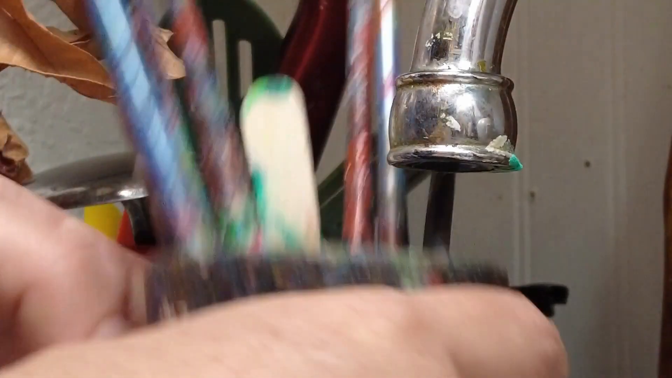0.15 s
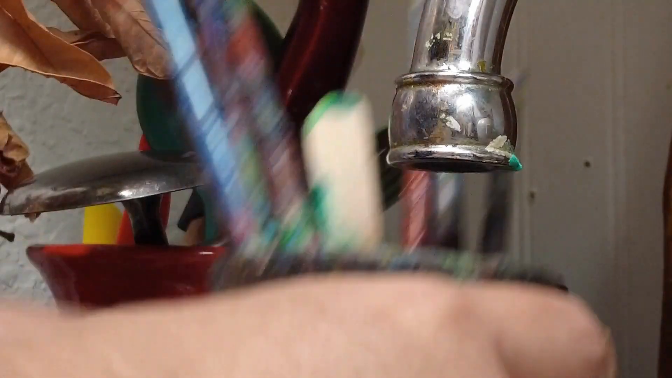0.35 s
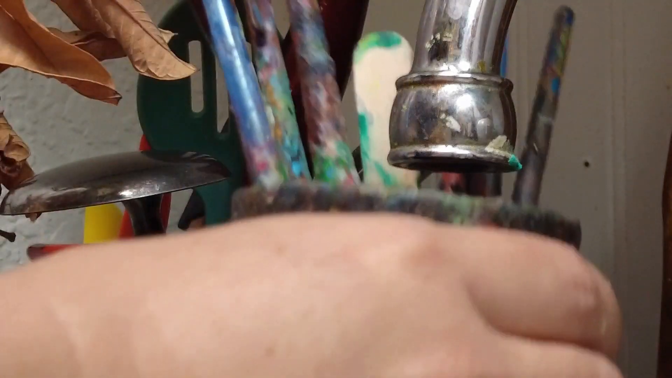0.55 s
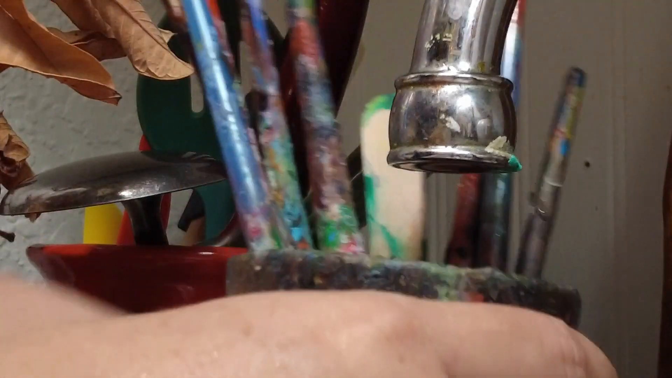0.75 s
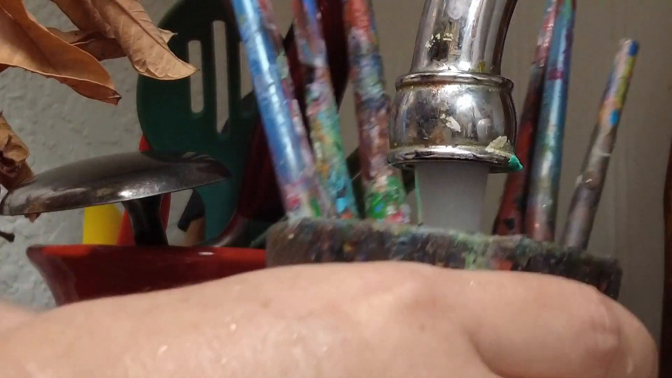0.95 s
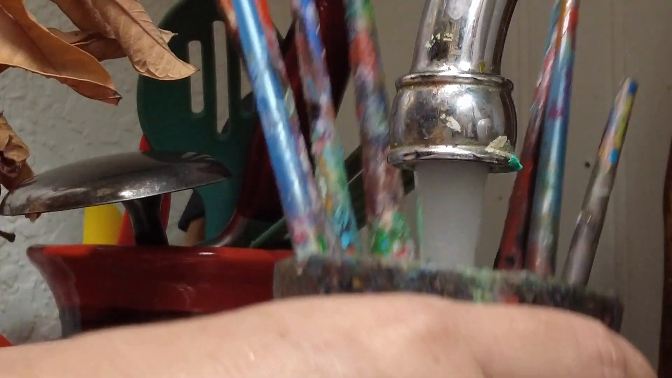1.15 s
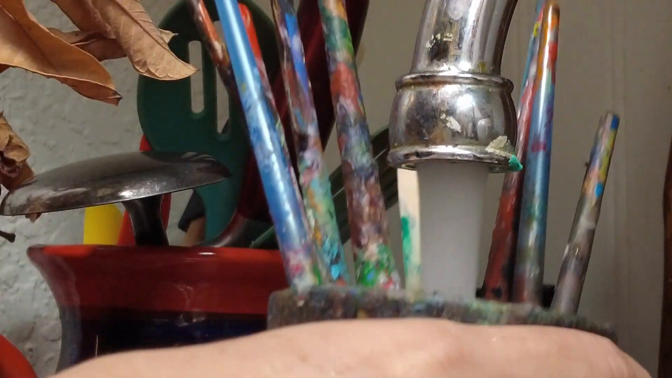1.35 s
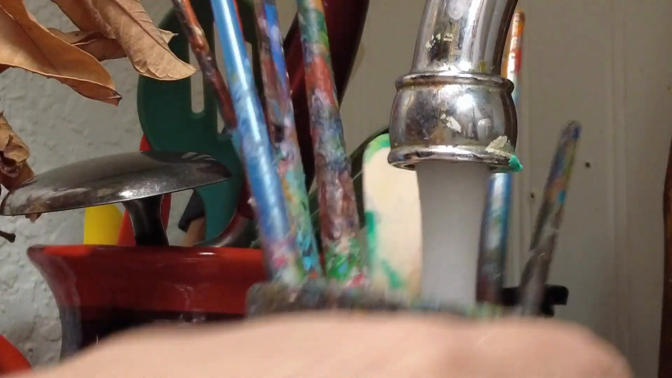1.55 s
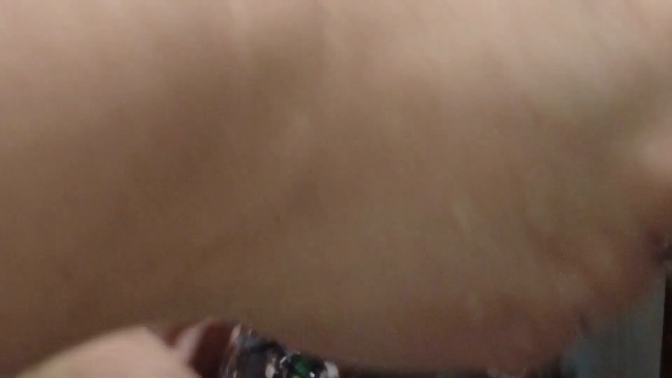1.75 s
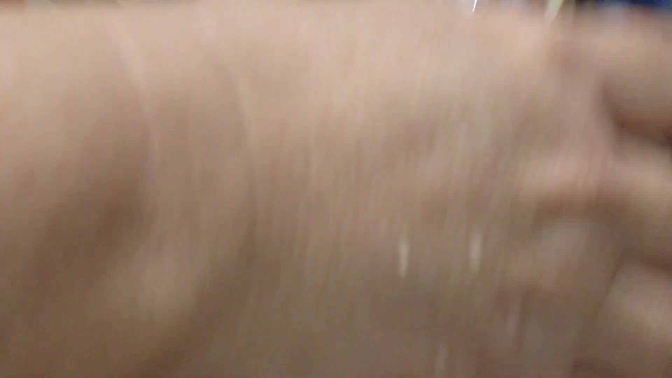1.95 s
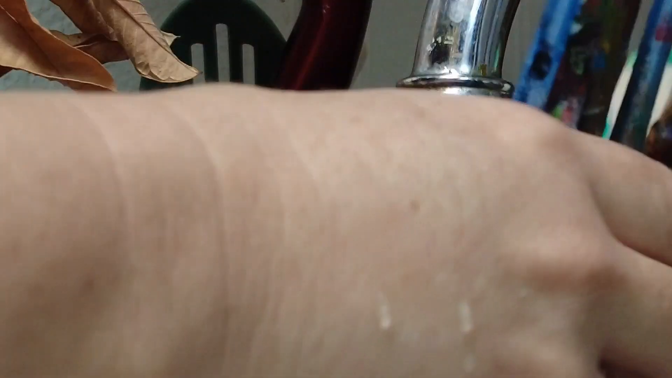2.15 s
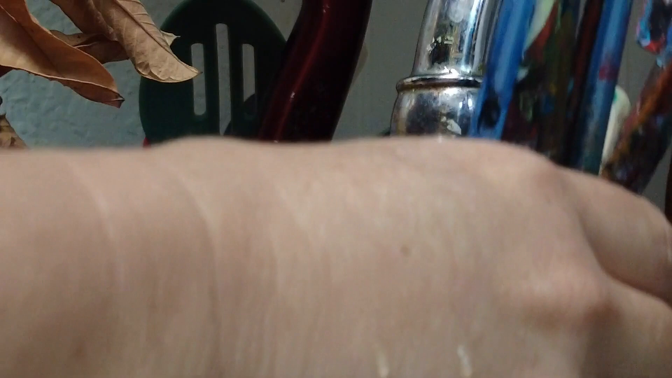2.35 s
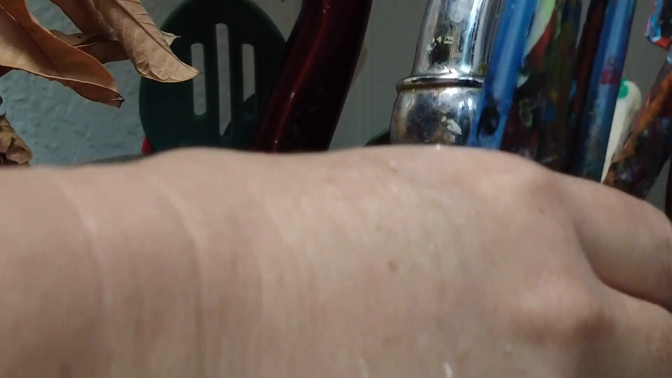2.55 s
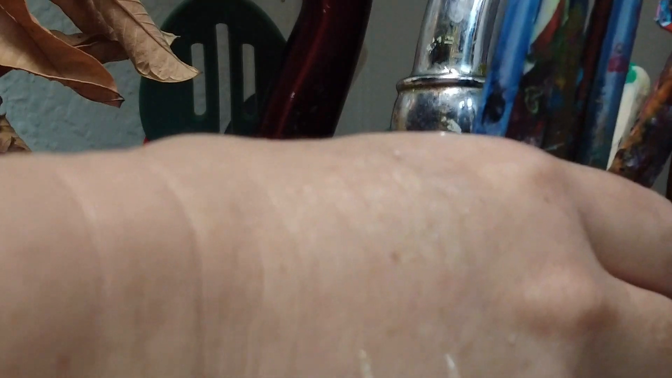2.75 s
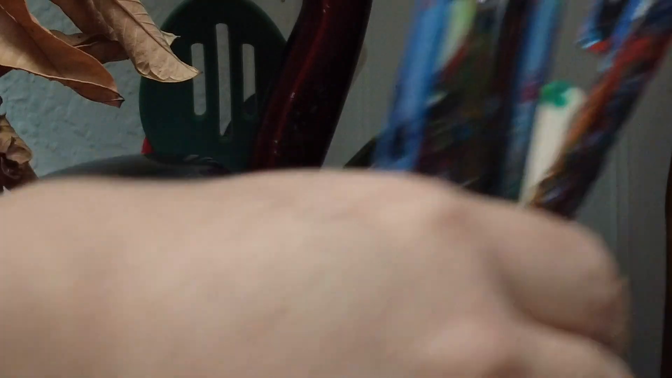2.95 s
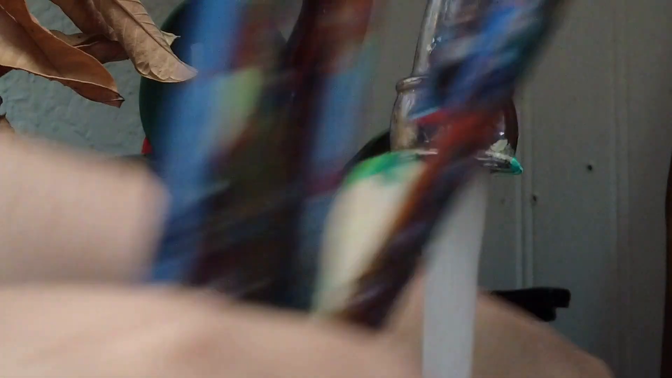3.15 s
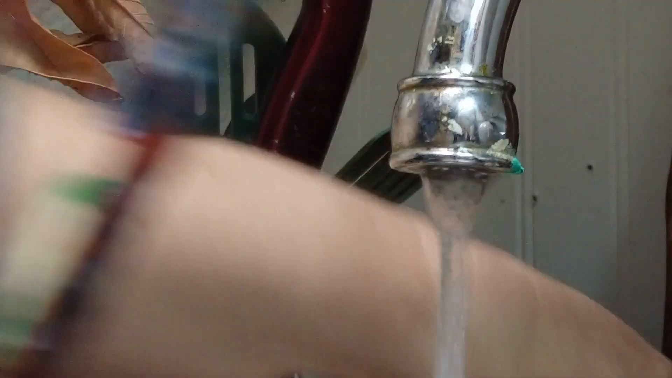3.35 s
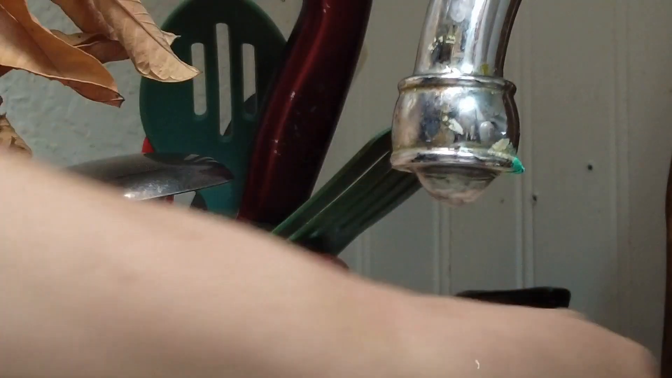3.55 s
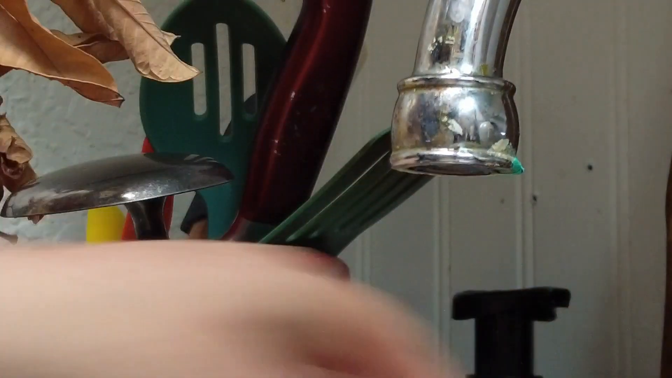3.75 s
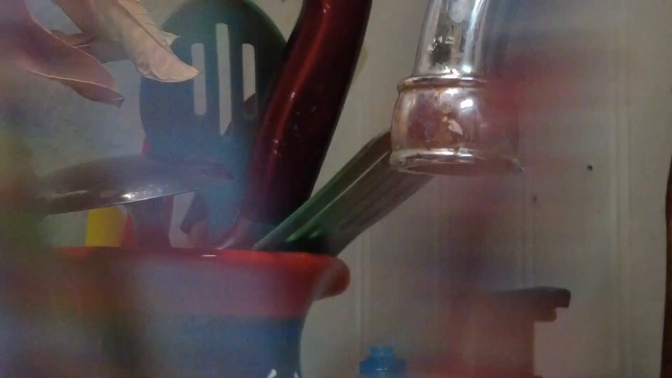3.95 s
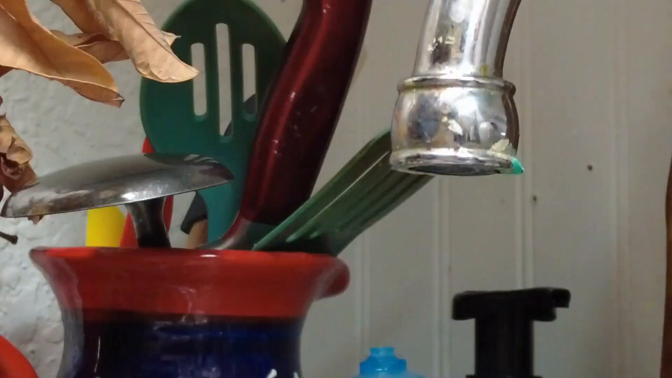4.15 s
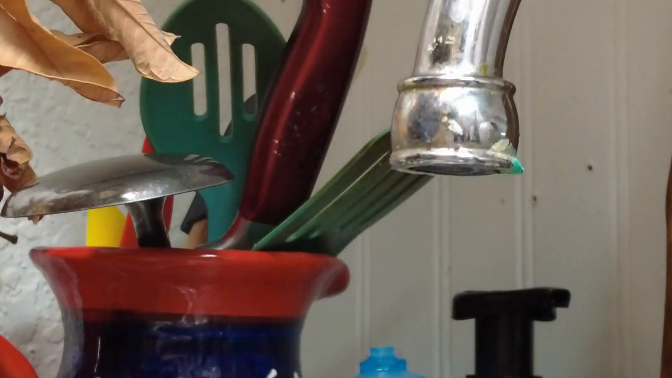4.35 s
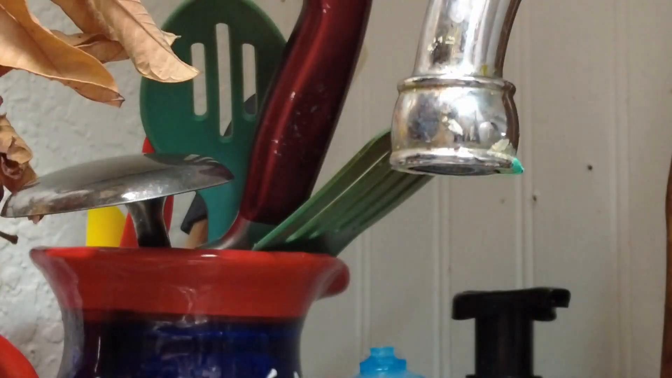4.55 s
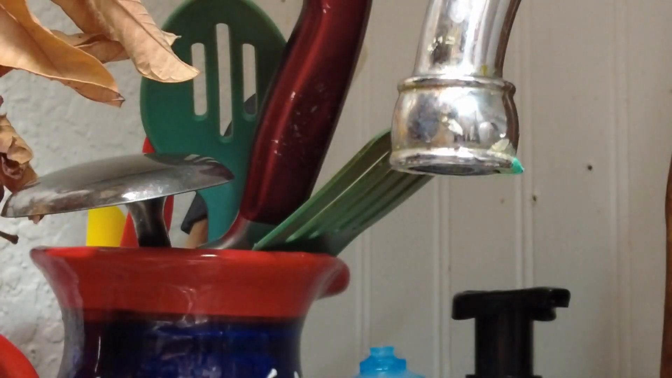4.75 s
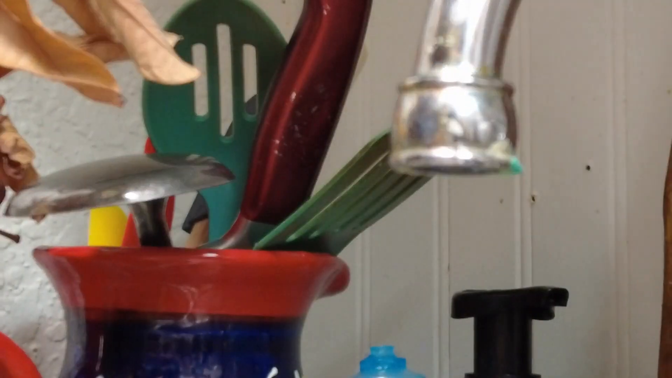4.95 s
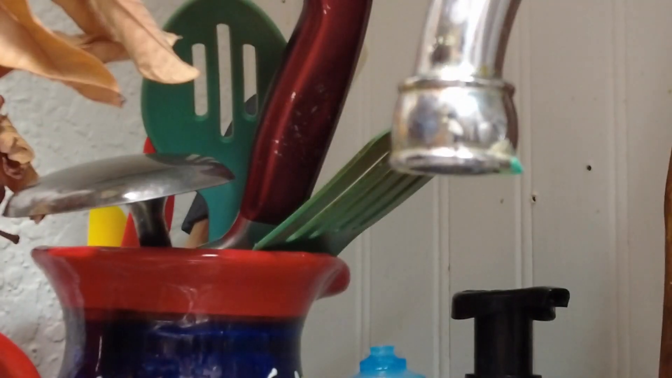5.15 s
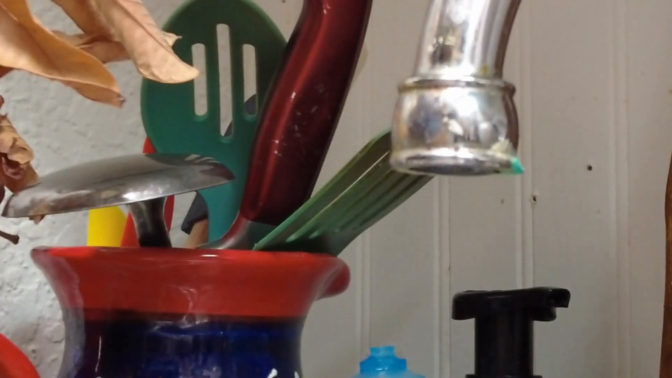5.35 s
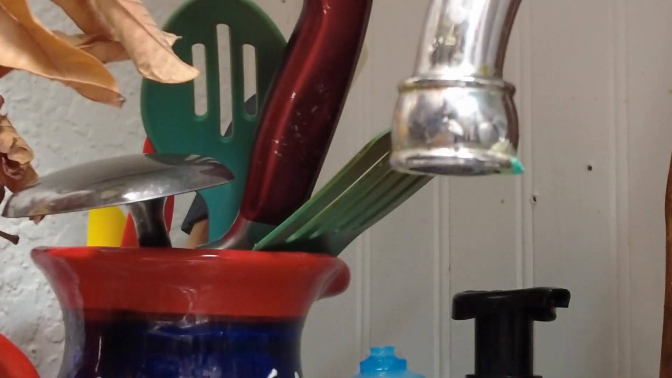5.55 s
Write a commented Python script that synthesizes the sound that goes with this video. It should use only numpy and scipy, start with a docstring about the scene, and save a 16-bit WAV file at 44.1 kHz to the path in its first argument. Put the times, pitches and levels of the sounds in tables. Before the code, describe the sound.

Close up, water drums and fizzes over a rattling cup of brushes, stops with a thump, and a cup lands before a raspy squeal.

```python
"""A quiet kitchen: a tap runs into a steel sink while a cup of paintbrushes is rinsed under it, heard close up.
Water is made of random drop impacts and noise, coloured by the basin and cup; bubbles are short rising tones.
Brush handles clack and scrape, the basin thumps and the tap is shut: blows are fading tones with a noise crack.
A thin squeal, built from unsteady tones, swells and fades off to one side; the cup is set down with a knock."""
import sys
import numpy as np
from scipy import signal
from scipy.fft import rfft, irfft, next_fast_len
from scipy.io import wavfile
from scipy.ndimage import uniform_filter1d, map_coordinates

SR = 44100
rng = np.random.default_rng(int(sys.argv[2]) if len(sys.argv) > 2 else 0)


def pcm_store(signal):
    """Save signal as 16-bit PCM."""
    levels = np.round(np.clip(np.atleast_2d(signal), -1, 1) * 32767)
    wavfile.write(sys.argv[1], SR, levels.astype(np.int16).T)


N = 251349  # length [samples]

# brush handles clacking in the cup: (time [s], peak level [dB], main ring [Hz])
HANDLE_CLACKS = [(.139, -26.5, 2700), (.216, -16.5, 2758), (.233, -23.5, 2740), (.987, -20.5, 3470),
                 (1.781, -13, 2935), (1.813, -11.5, 3170), (1.8395, -4.5, 3050), (1.933, -13, 2620),
                 (2.004, -12.5, 3530), (2.038, -14.5, 2600), (2.0524, -1.5, 2627), (2.1032, -3.5, 2630),
                 (2.12, -12.5, 2707), (2.187, -15, 2090), (3.178, -12, 2724), (3.362, -17.5, 3070),
                 (3.393, -11.5, 3100), (3.464, -17, 3220), (3.558, -13, 3083), (3.593, -13, 3070),
                 (3.885, -31.5, 2970)]
# ringing tones of the cup: (frequency [Hz], level [dB], time to fade by 60 dB [s])
CUP_MODES = [(1009.4, -14, 0.15), (1463, 4, 0.064), (1872, -2.5, 0.048), (2430, -5.5, 0.033),
             (2725, -6.5, 0.063), (3560, -22, 0.068), (4200, -15.5, 0.057), (6600, -42, 0.025)]
# colour of the fizzing jet and of the last drops: (frequency [Hz], level [dB per Hz])
FIZZ_COLOUR = [(300, -37), (1000, -8.5), (2300, 7), (3000, 8.5), (3650, 4), (4300, 6.5), (5600, 3.5),
               (7000, -1.5), (7900, 2.5), (10000, 0.5), (13000, -2.5), (15800, -3.5)]

OPEN_S, SHUT_S = 0.805, 3.465  # the water starts; the tap is shut
CUP_OUT_S, GURGLE_RELEASE_S = 2.95, 0.85  # the cup leaves the stream; its gurgle then dies away
TIP_S, TIP_LENGTH_S = 1.89, 1.5  # the cup is tipped: middle and length


def amp(db):
    """Turn decibels into a gain."""
    return 10 ** (np.asarray(db) / 20)


def unit(x):
    """Scale a sound to an average (rms) level of 1."""
    return x / np.sqrt(np.mean(x ** 2) + 1e-20)


def along(points, hz):
    """Read a curve of (frequency [Hz], value) points on a log frequency axis."""
    f, v = np.transpose(points)
    return np.interp(np.log(hz + 1), np.log(f + 1), v)


def colour(points):
    """A filter that follows (frequency [Hz], level [dB]) points."""
    return lambda hz: amp(along(points, hz))


def resonator(modes):
    """A filter with (frequency [Hz], width [Hz], level [dB]) resonances."""
    def response(f):
        total = 0
        for k, (centre, width, db) in enumerate(modes):
            peak = 1j * f * width / (centre * centre - f * f + 1j * f * width)
            total = total + (-1) ** k * amp(db) * peak  # alternate signs
        return total
    return response


def wobble(rate):
    """A smooth random curve with rate knots a second."""
    knots = rng.standard_normal(int(N * rate / SR) + 4)
    return map_coordinates(knots, [np.arange(N) * rate / SR])


def filtered(x, response):
    """Multiply the spectrum of x by a complex response of frequency."""
    m = next_fast_len(N + SR // 2)
    return irfft(rfft(x, m) * response(np.fft.rfftfreq(m, 1 / SR)), m)[..., :N]


def noise():
    """Two unrelated channels of white noise."""
    return rng.standard_normal((2, N))


def stereo(pair, response):
    """Colour two unrelated signals and blend them into left and right at rms 1."""
    # likeness of left and right: (frequency [Hz], likeness [0 to 1])
    likeness = [(100, 0.97), (330, 0.91), (600, 0.2), (1500, 0.78), (3000, 0.59), (5000, 0.11),
                (8000, 0.99), (15000, 0.98)]

    def blend(hz):
        turn = np.arccos(np.clip(along(likeness, hz), -1, 1)) / 2
        return response(hz) * np.array([np.cos(turn), np.sin(turn)])
    mid, side = filtered(pair, blend)
    return unit(np.array([mid + side, mid - side]))


def patter(rate, spread_db):
    """Two trains of impacts, rate a second, with shared times and scattered sizes."""
    hit = rng.random(N) < rate / SR
    scatter = np.clip(rng.standard_normal(N), -2, 2)
    size = hit * amp(np.clip(spread_db, 0, 10) * scatter)
    return unit(size * noise())


def patchy(pair, depth_db):
    """Make random patches of time and pitch louder or softer, so the sound keeps changing."""
    z = signal.stft(pair, nperseg=512)[2]
    field = uniform_filter1d(rng.standard_normal(z.shape[1:]), size=7, axis=0)
    field = uniform_filter1d(field, size=7, axis=1)
    return signal.istft(z * amp(depth_db * unit(field)), nperseg=512)[1][:, :N]


def walls(x, echo_db, count):
    """Echoes off the close sink walls cut fixed ripples into the spectrum."""
    echoes = 0
    for delay_s in rng.uniform(.0008, .009, count):
        echoes = echoes + np.pad(x, ((0, 0), (int(delay_s * SR), 0)))[:, :N]
    return unit(x + amp(echo_db) * echoes)


def tone(hz, partials, jitter, flutter_db):
    """Sum partials (multiple of the pitch, level [dB]) on an unsteady pitch, each fluttering in level."""
    phase = 2 * np.pi * np.cumsum(hz * (1 + jitter * wobble(500))) / SR
    return unit(sum(amp(db + flutter_db * wobble(45)) * np.sin(k * phase) for k, db in partials))


def envelope(start, end, attack, release):
    """Gain that rises from start, holds until end, then falls to silence."""
    t = np.arange(N) / SR
    return np.clip((t - start) / attack, 0, 1) * np.clip(1 - (t - end) / release, 0, 1)


def bursts(rows):
    """Summed gain of (start [s], end [s], level [dB], attack [s], release [s]) bursts."""
    return sum(amp(db) * envelope(start, end, attack, release) for start, end, db, attack, release in rows)


def swell(middle, length):
    """Gain that rises smoothly to 1 and falls again."""
    return np.cos(np.pi * np.clip((np.arange(N) / SR - middle) / length, -.5, .5)) ** 2


def swells(rows):
    """Summed gain of (middle [s], length [s], level [dB]) swells."""
    return sum(amp(db) * swell(middle, length) for middle, length, db in rows)


def tipped(gain_db):
    """Extra gain while the cup is tipped in the stream."""
    return amp(gain_db * swell(TIP_S, TIP_LENGTH_S))


def add(track, s, sound):
    """Mix a sound into the track from time s."""
    room = track[round(s * SR):][:len(sound)]
    room += sound[:len(room)]


def strike(modes, rise, rough, crack_db, crack_t60):
    """One blow of peak 1: fading tones, blurred by loose contact, and a short crack of noise."""
    t = np.arange(SR // 3) / SR
    hz, db, t60 = np.transpose(modes)[:, :, None]
    steps = rng.standard_normal((len(modes), len(t)))
    drift = rough * np.cumsum(steps, axis=1) * np.sqrt(hz / SR)
    phase = 2 * np.pi * (hz * t + rng.random(hz.shape)) + drift
    ring = np.sum(amp(db - 60 * t / t60) * np.sin(phase), axis=0) * (1 - np.exp(-t / rise))
    crack = amp(crack_db - 60 * t / crack_t60) * rng.standard_normal(len(t))
    blow = ring / np.abs(ring).max() + crack
    return blow / np.abs(blow).max()


def blows(events, modes, rise_s, softening, rough, crack_db, crack_t60):
    """Blows on one object; bright contact favours its high tones, and weak blows rise more slowly."""
    track = np.zeros(N)
    lowest_hz = modes[0][0]
    for s, db, tilt_db in events:
        tilted = [(hz, level + tilt_db * np.log2(hz / lowest_hz), t60) for hz, level, t60 in modes]
        blow = strike(tilted, rise_s * amp(-softening * db), rough, crack_db + tilt_db, crack_t60)
        add(track, s, amp(db) * blow)
    return track


def aside(x, lag_s):
    """A sound from one side: the right channel gets it lag_s after the left."""
    return filtered(x, lambda hz: np.exp(1j * np.pi * lag_s * np.array([hz, -hz])))


def background():
    """Steady room rumble from noise, mains hum from sines, and faint rubs of handling from noise."""
    # room rumble and handling rubs: (frequency [Hz], level [dB per Hz])
    quiet_colour = [(20, 0.5), (45, 3), (90, -12), (165, -21), (280, -21), (500, -24), (1000, -34),
                    (1600, -32.5), (2700, -34.5), (5000, -38), (15600, -46.5)]
    rub_colour = [(200, -4.5), (450, -0.5), (800, -3.5), (1200, -1), (1500, 6), (2200, -1.5), (2850, 3),
                  (3500, -3.5), (5300, -5.5), (6800, -12), (8500, -10.5), (15000, -20)]
    # mains hum: (frequency [Hz], level [dB])
    hum_tones = [(120, -65), (241, -69.5)]
    # when something rubs: (middle [s], length [s], level [dB])
    rub_times = [(.15, 0.4, -49), (.41, 0.4, -56), (3.96, .55, -49), (4.32, 0.65, -52.5), (4.98, 0.9, -48),
                 (5.45, 0.45, -48.5), (5.69, 0.29, -52.5)]
    air = amp(-44.0) * stereo(noise(), colour(quiet_colour))
    t = np.arange(N) / SR
    hum = sum(amp(db) * unit(np.sin(2 * np.pi * hz * t)) for hz, db in hum_tones)
    rustle = stereo(patchy(noise(), depth_db=1.5), colour(rub_colour))
    return air + hum + swells(rub_times) * walls(rustle, echo_db=-4.5, count=5)


def squeak():
    """A short, hoarse squeak as the cup is lifted: a rough tone gliding slightly upward."""
    # overtones of the squeak: (multiple of the pitch, level [dB])
    hoarse_partials = [(.5, -4.5), (1, 4), (2, -7), (4, 4.5), (6, -0.5), (8, -5.5)]
    start_s, end_s = 0.012, 0.07
    pitch_hz, glide_hz_per_s = 1008, 240
    age = np.clip(np.arange(N) / SR, start_s, end_s) - start_s
    voice = tone(pitch_hz + glide_hz_per_s * age, hoarse_partials, jitter=.022, flutter_db=4)
    # level before scene() lifts squeak and squeal together
    return amp(-48.5) * envelope(start_s, end_s, attack=0.015, release=0.045) * voice


def brushes():
    """Each handle rings at its own pitch, rebounds once and sets the cup humming; harder blows crack more."""
    # tones of one handle: (multiple of the main ring, level [dB])
    handle_tones = [(0.368, -21.5), (0.718, -19.5), (.94, -6), (1.002, 0.5), (1.059, -9), (1.5, -21.5),
                    (2.422, -18.5), (2.9, -26)]
    ring_t60_s, rebound_s, rebound_loss_db = 0.066, .018, 13.5
    cup_db, cup_db_per_db = -30, 0.32  # cup hum after a clack of 0 dB, and its change per dB of clack
    track = np.zeros(N)
    for s, db, hz in HANDLE_CLACKS:
        modes = [(hz * multiple, level, ring_t60_s) for multiple, level in handle_tones]
        for when, peak_db in (s, db), (s + rebound_s, db - rebound_loss_db):
            clack = strike(modes, rise=0.00037, rough=0.25, crack_db=-12 + 1.3 * peak_db, crack_t60=0.026)
            add(track, when, amp(peak_db) * clack)
        # only the lowest tone of the cup answers
        cup_hum = strike(CUP_MODES[:1], rise=.002, rough=0.33, crack_db=-26, crack_t60=.05)
        add(track, s, amp(cup_db + cup_db_per_db * db) * cup_hum)
    return track


def scrapes():
    """Gritty chatter of wet handles sliding on each other after each clack: many tiny impacts that fade."""
    # colour of the scraping: (frequency [Hz], level [dB per Hz])
    scrape_colour = [(800, -21), (1800, -3), (3300, 1), (4800, -5), (7000, -11.5), (15000, -24)]
    below_clack_db, t60_s = -19.5, 0.11
    t = np.arange(N) / SR
    level = 0
    for s, db, _ in HANDLE_CLACKS:
        level = level + amp(db + below_clack_db - 60 * np.abs(t - s) / t60_s) * (t > s)
    return level * stereo(patter(rate=2500, spread_db=3), colour(scrape_colour))


def pipe():
    """Low noise: the tap body shudders from the grip on the lever on, and jolts when the lever is worked."""
    # colour of the shaking pipe: (frequency [Hz], level [dB per Hz])
    pipe_colour = [(20, -4.5), (32, 9), (55, -5.5), (80, -7.5), (120, -7.5), (200, -44), (500, -93)]
    # jolts of the lever: (time [s], level [dB])
    lever_jolts = [(.62, -35.5), (.955, -29), (3.49, -20.5)]
    jolt_rise_s, jolt_t60_s = 0.01, 0.23
    grip_s = 0.59  # the lever is gripped before the water comes
    t = np.arange(N) / SR
    jolts = 0
    for s, db in lever_jolts:
        rise = np.clip(1 + (t - s) / jolt_rise_s, 0, 1)
        jolts = jolts + amp(db - 60 * np.abs(t - s) / jolt_t60_s) * rise
    running = amp(-41) * tipped(3.5) * envelope(grip_s, SHUT_S, attack=.03, release=0.82)
    return (running + jolts) * stereo(noise(), colour(pipe_colour))


def knocks():
    """Dull bumps on the basin and clearly ringing taps on the cup, each object with its own tones."""
    # bumps on the basin and taps on the cup: (time [s], peak level [dB], brightness [dB per octave])
    basin_bumps = [(.603, -27, -9.5), (.936, -7, 2.5), (1.897, -18, -5), (2.229, -15, -3),
                   (2.579, -17.5, 1), (2.983, -12.5, 10.5), (3.477, 0.5, -.5), (3.92, -30.5, 10.5)]
    cup_taps = [(2.928, -15, -11.5), (3.88, -32.5, 2.5), (4.109, -24.5, 4.5), (4.174, -30.5, 13.5),
                (4.195, -27, -2.5), (4.206, -15, 2), (4.237, -27, -6), (4.776, -35, -13)]
    # tones of the bumped basin: (frequency [Hz], level [dB], time to fade by 60 dB [s])
    bottom_modes = [(119.3, -21.5, 0.25), (234.7, -33, 0.37), (348, -4.5, 0.11), (401, -11, 0.099),
                    (454, -4, 0.061), (534, -14.5, 0.05), (664, -8.5, 0.025), (800, -10, 0.033),
                    (964, -14.5, 0.031), (1170, -23, 0.038), (1550, -33.5, 0.14)]
    basin = blows(basin_bumps, bottom_modes, rise_s=.0016, softening=0.39, rough=0.087,
                  crack_db=-42, crack_t60=.02)
    cup = blows(cup_taps, CUP_MODES, rise_s=.0012, softening=.15, rough=0.14, crack_db=-27, crack_t60=0.07)
    return basin + cup


def tick():
    """The tap lever gives with a dry, toneless tick: a noise burst that fades at once."""
    # colour of the tick: (frequency [Hz], level [dB per Hz])
    tick_colour = [(300, -2), (1200, -0.5), (3200, 0.5), (5000, -13), (15000, -21)]
    start_s, level_db, t60_s = .65, -36, 0.1
    age = np.arange(N) / SR - start_s
    burst = stereo(noise(), colour(tick_colour))
    return amp(level_db - 60 * np.abs(age) / t60_s) * (age > 0) * burst


def wetting():
    """The drumming starts 6 dB down and grows as water gathers on the basin."""
    age = np.maximum(np.arange(N) / SR - OPEN_S, 0)
    return amp(-6 * np.exp(-age / .4))


def filling():
    """Gain of the water running into the cup."""
    return amp(-34.5) * envelope(OPEN_S, CUP_OUT_S, attack=0.18, release=GURGLE_RELEASE_S)


def stream():
    """Dense drops drum on the basin, gurgle in the cup and slop out of it while the airy jet fizzes."""
    # resonances of wet basin, filling cup and basin floor: (frequency [Hz], width [Hz], level [dB])
    basin_modes = [(126.8, 11.3, -9), (337.6, 16.3, 3), (416, 46, -6), (580, 76, -12.5), (804, 19, -7.5),
                   (901, 33, -8), (1006, 60, -8.5), (1110, 13, -5), (1190, 19, -6), (1308, 39, -8.5)]
    hollow_modes = [(1458, 29, 1.5), (1775, 43, 5.5), (1930, 79, -1.5), (2516, 170, -17), (2707, 40, -1),
                    (3020, 37, -25), (3240, 72, -10), (4110, 87, -5.5), (4530, 160, -9.5)]
    floor_modes = [(126, 18, -5.5), (380, 55, -12), (448, 39, -8), (890, 72, -10), (1023, 120, -10),
                   (1420, 230, -12.5), (2110, 180, -13)]
    # water slopping from the tipped cup: (start [s], end [s], level [dB], attack [s], release [s])
    slop_times = [(1.717, 1.876, -26.5, .06, .12), (2.04, 2.123, -30.5, .06, .12)]
    drum = stereo(patchy(patter(rate=1500, spread_db=1.5), depth_db=1.5), resonator(basin_modes))
    gurgle = stereo(patchy(patter(rate=1600, spread_db=0.0), depth_db=3), resonator(hollow_modes))
    slop = stereo(patter(rate=500, spread_db=2), resonator(floor_modes))
    jet = stereo(patchy(patter(rate=12000, spread_db=.5), depth_db=2.3), colour(FIZZ_COLOUR))
    fizz = walls(jet, echo_db=-12.5, count=6)
    drum_gain = amp(-31 + 1.0 * wobble(25)) * tipped(1.5) * wetting()
    drum_gain *= envelope(OPEN_S, SHUT_S, attack=0.043, release=0.48) ** 2
    fizz_gain = amp(-34.5 + .32 * wobble(40)) * tipped(4)
    fizz_gain *= envelope(OPEN_S, SHUT_S, attack=.17, release=.25)
    return drum_gain * drum + fizz_gain * fizz + filling() * gurgle + bursts(slop_times) * slop


def bubbles(count, centre_hz, spread, cycles):
    """Trapped air rings briefly in the filling cup, each bubble rising in pitch."""
    track, t = np.zeros(N), np.arange(SR // 25) / SR
    times = rng.uniform(OPEN_S, CUP_OUT_S + GURGLE_RELEASE_S, count)
    for when, (pitch, size) in zip(times, rng.standard_normal((count, 2))):
        hz = np.clip(centre_hz * np.exp(spread * pitch), 400, 6000)
        age = t * hz / cycles
        gain = amp(2.7 * size) * np.exp(-2 * age) * (1 - np.exp(-10 * age))
        add(track, when, gain * np.sin(2 * np.pi * hz * t * (1 + 0.044 * age)))
    return unit(track) * filling()


def spray():
    """The jet glances off cup and hand and bursts into fine droplets: very dense impacts plus noise."""
    # colour of the spray: (frequency [Hz], level [dB per Hz])
    spray_colour = [(1000, -14.5), (2200, -12.5), (3050, 2.5), (3800, -0.5), (4200, 1), (4900, -2.5),
                    (6000, 1.5), (6900, -0.5), (8500, -0.5), (11000, -1.5), (15600, -4.5)]
    # bursts of spray: (start [s], end [s], level [dB], attack [s], release [s])
    spray_times = [(1.72, 1.839, -22, 0.0062, 0.045), (1.777, 1.801, -24.5, .008, .015),
                   (3.173, 3.454, -21, 0.0066, 0.22), (3.189, 3.204, -16, 0.0089, 0.016),
                   (3.609, 3.615, -32.5, .005, 0.017)]
    drops = patchy(patter(rate=13000, spread_db=4.0), depth_db=2.0)
    mist = walls(stereo(drops, colour(spray_colour)), echo_db=-13.5, count=6)
    # the nearest drops reach left and right unalike
    near = unit(filtered(noise(), colour(spray_colour)))
    return amp(0.74 + 1.6 * wobble(90)) * bursts(spray_times) * (mist + amp(-8.5) * near)


def dribble():
    """The last water trickles from the spout once the tap is shut: fewer drops, fading out."""
    release_s = 0.43
    drops = stereo(patter(rate=510, spread_db=0.5), colour(FIZZ_COLOUR))
    return amp(-56) * envelope(SHUT_S, SHUT_S + release_s / 2, attack=.1, release=release_s) * drops


def squeal():
    """A thin squeal breaks into a raspy buzz as its period doubles twice, and a clear whistle joins in."""
    # the pitch sags and recovers: (time [s], pitch [Hz])
    pitch_curve = [(4.3, 2297), (4.66, 2175), (4.85, 2070), (4.93, 1987), (4.99, 2024), (5.06, 2018),
                   (5.26, 2087), (5.42, 2126), (5.7, 2160)]
    # overtones of the shrill and buzzy voices: (multiple of the pitch, level [dB])
    shrill_partials = [(1, -17), (2, 0), (3, -7), (4, -20)]
    buzzy_partials = [(0.499, -9.5), (0.751, -9), (1, 1), (1.25, -16), (1.499, -2), (1.999, -9.5),
                      (2.25, -14.5), (2.5, -16), (2.75, -15)]
    # shrill swells, before the lift in scene(): (middle [s], length [s], level [dB])
    shrill_times = [(4.37, 0.48, -62), (4.77, 0.37, -47.5), (5.44, 0.33, -53.5), (5.7, 0.19, -54)]
    # resonances of the rasp: (frequency [Hz], width [Hz], level [dB])
    rasp_modes = [(1533, 59, 1), (2070, 130, -2.5), (2860, 250, -5), (4126, 290, -10), (5300, 620, -13.5)]
    hz = np.interp(np.arange(N) / SR, *np.transpose(pitch_curve))
    shrill = tone(hz, shrill_partials, jitter=.022, flutter_db=3)
    buzz = tone(hz, buzzy_partials, jitter=0.01415, flutter_db=5)
    whistle = tone(hz, [(1, 0)], jitter=.008, flutter_db=3)
    rasp = amp(-5) * stereo(noise(), resonator(rasp_modes)).mean(axis=0)
    buzzing = amp(-43.5) * swell(middle=5.11, length=0.694) * (buzz + rasp)
    whistling = amp(-37) * swell(middle=5.2, length=0.39) * whistle
    return swells(shrill_times) * shrill + buzzing + whistling


def landing():
    """The cup lands on the counter and rocks: a few quick blows ring the counter's tones."""
    # blows of the landing: (time [s], peak level [dB], brightness [dB per octave])
    landing_blows = [(4.494, -24, 5.5), (4.504, -20, 9), (4.5105, 3, 4.5), (4.528, -6.5, -3.5),
                     (4.584, -19.5, -0.5)]
    # tones of the counter: (frequency [Hz], level [dB], time to fade by 60 dB [s])
    counter_modes = [(118.6, -6.5, 0.19), (237.7, -12, 0.15), (336, 1.5, 0.082), (408, 7.5, 0.041),
                     (472, -7, 0.087), (550, 4.5, 0.037), (610, 4, 0.038), (713, -2, 0.1), (806, 1, 0.04),
                     (849, 1.5, 0.039), (1116, -19, 0.14), (1248, -9.5, 0.12), (1326, -6.5, 0.081),
                     (1398, -3.5, 0.037), (1796, -27.5, 0.2), (1870, -15.5, 0.044), (2330, -33.5, 0.13),
                     (2947, -20, 0.047)]
    return blows(landing_blows, counter_modes, rise_s=0.00035, softening=1.3, rough=0.25,
                 crack_db=-62, crack_t60=0.017)


def kitchen(x):
    """Sink walls and room answer with a short tail of fading noise, nearly alike left and right in the bass."""
    # how long the room rings: (frequency [Hz], time to fade by 60 dB [s])
    room_t60 = [(150, 0.28), (1000, 0.18), (3000, 0.17), (12000, 0.13)]
    hz, t, z = signal.stft(rng.standard_normal((2, SR // 2)), SR, nperseg=256)
    fade = amp(-60 * t / along(room_t60, hz)[:, None])
    tail = signal.istft(z * fade, SR, nperseg=256)[1]
    mid, side = signal.fftconvolve(x[None], tail / np.linalg.norm(tail[0]), axes=1)[:, :N]
    # width of the echo: (frequency [Hz], gain)
    width = [(150, 0.17), (600, 1.3), (4000, 1.2), (8000, 0.8)]
    side = filtered(side, lambda f: along(width, f))
    return np.array([mid + side, mid - side])


def scene():
    """Water, blows and squeals at the sink, with the kitchen's answer."""
    whine = amp(2.5) * (squeak() + squeal())
    hits = brushes() + knocks()
    thud = landing()
    air_bubbles = amp(-9.5) * bubbles(count=260, centre_hz=1295, spread=.55, cycles=23)
    water = pipe() + stream() + air_bubbles + spray() + dribble()
    # the thud reaches the right first, the whine the left
    direct = hits + aside(thud, lag_s=-0.000097) + aside(whine, lag_s=.00008)
    echo = kitchen(amp(-10.5) * hits + amp(-8.5) * thud + amp(-2) * whine)
    return direct + echo + water + scrapes() + tick() + background()


def record(dry):
    """Clip at full scale, then remove everything from 15730 Hz up."""
    return filtered(np.clip(dry, -1, 1), lambda hz: hz < 15730)


dry = scene()
out = record(dry)
pcm_store(out)
```